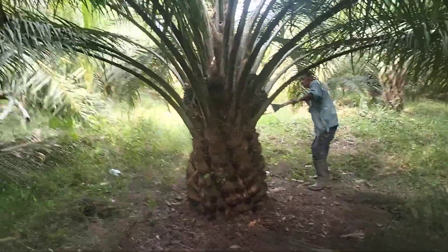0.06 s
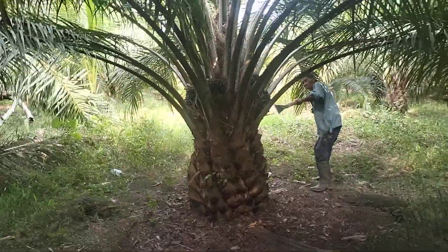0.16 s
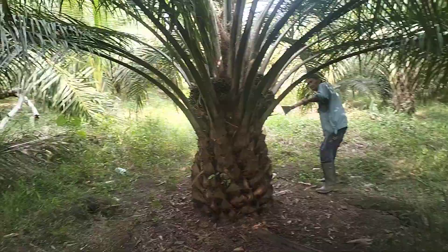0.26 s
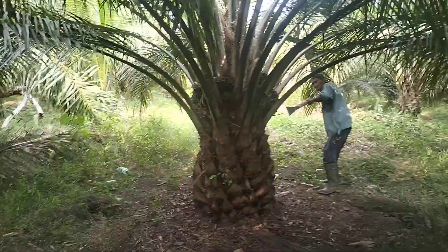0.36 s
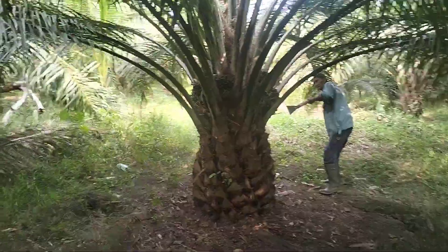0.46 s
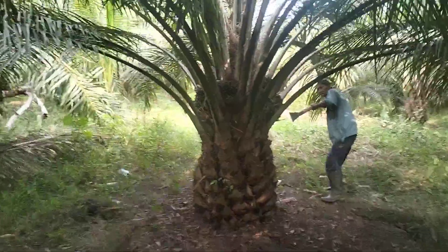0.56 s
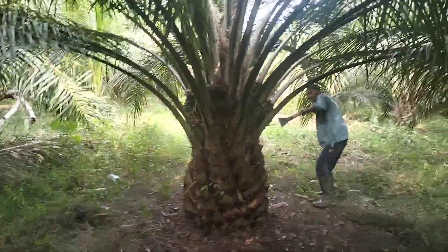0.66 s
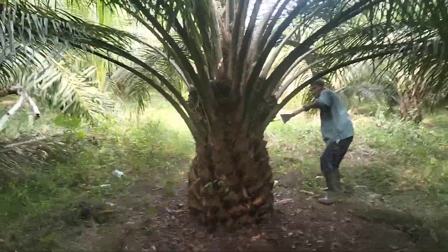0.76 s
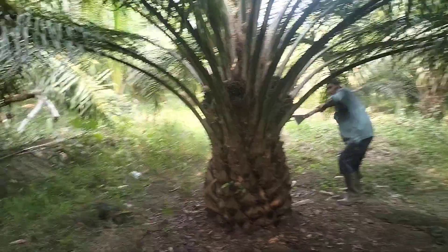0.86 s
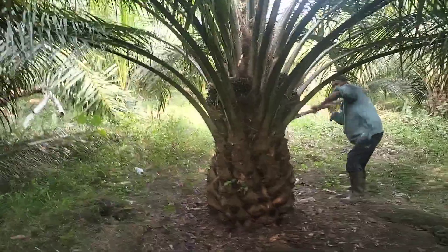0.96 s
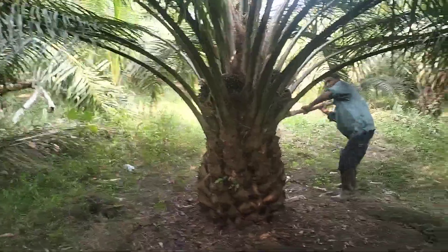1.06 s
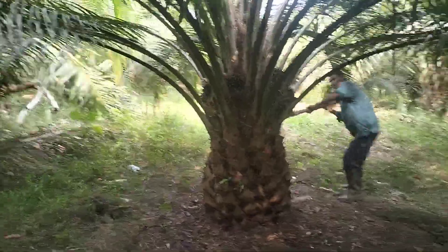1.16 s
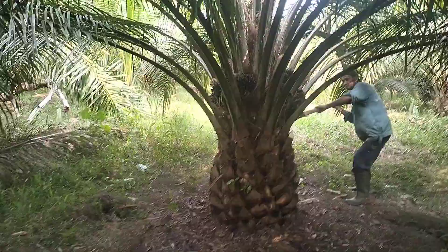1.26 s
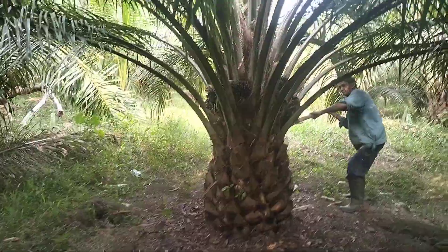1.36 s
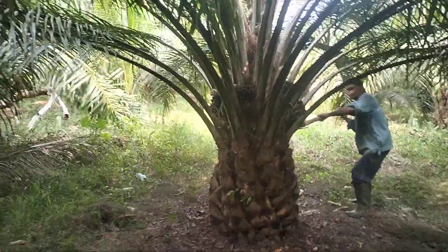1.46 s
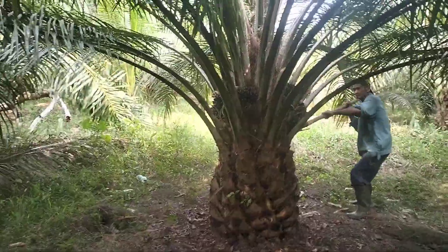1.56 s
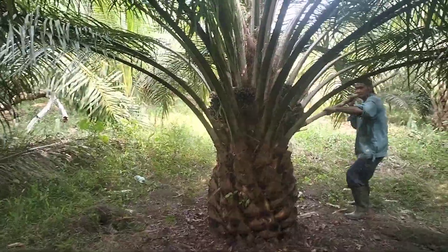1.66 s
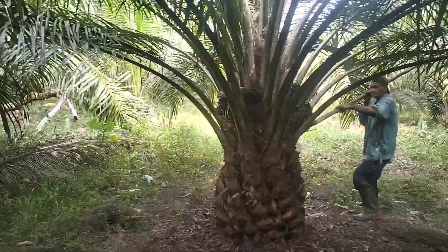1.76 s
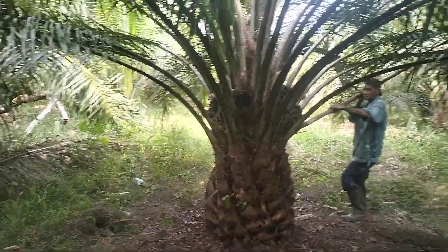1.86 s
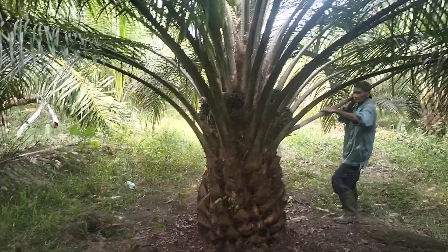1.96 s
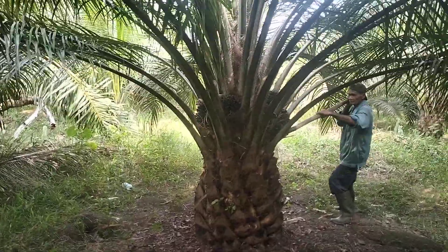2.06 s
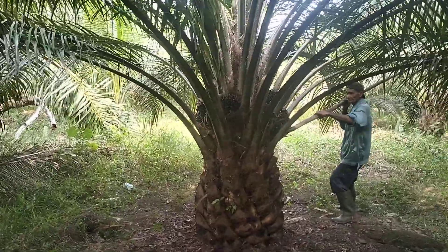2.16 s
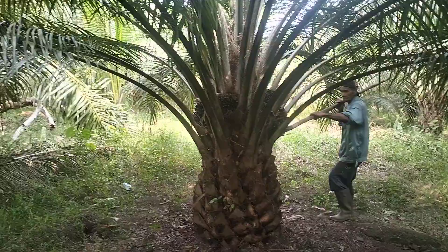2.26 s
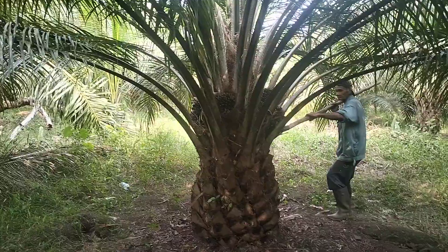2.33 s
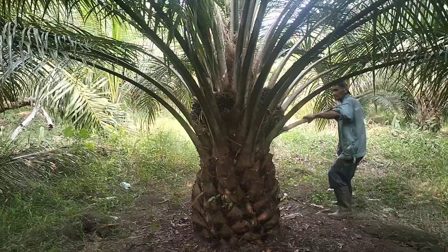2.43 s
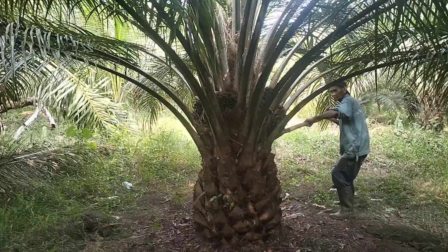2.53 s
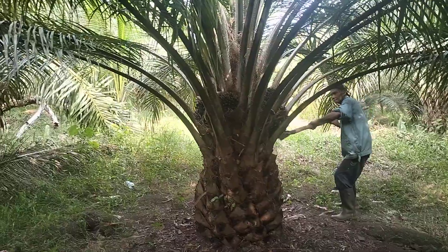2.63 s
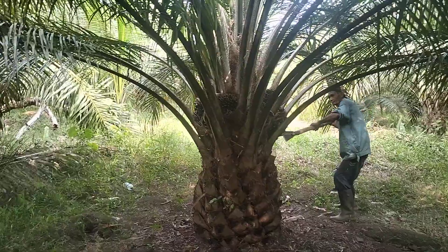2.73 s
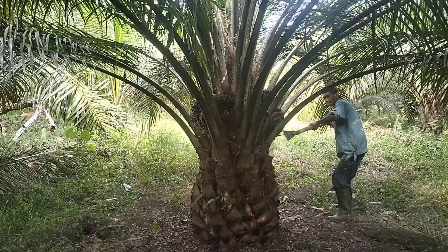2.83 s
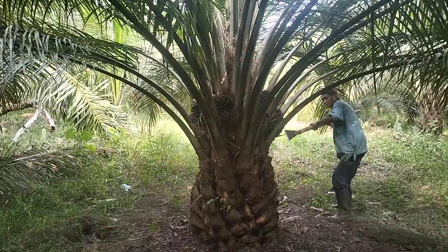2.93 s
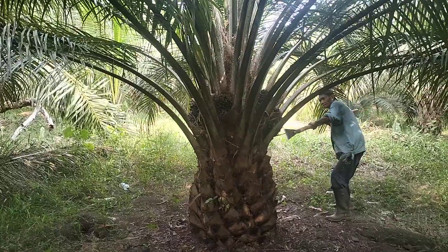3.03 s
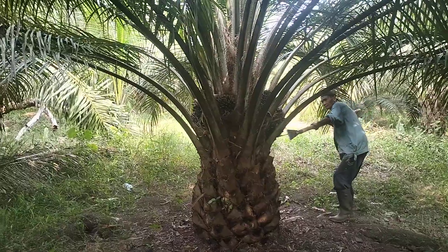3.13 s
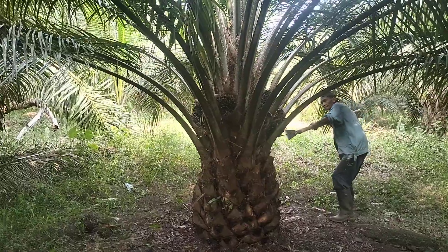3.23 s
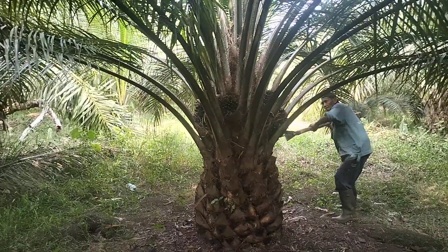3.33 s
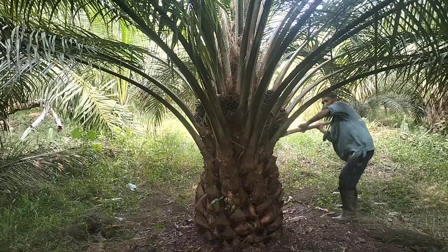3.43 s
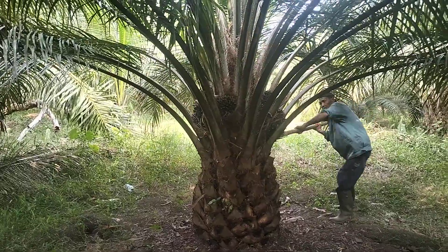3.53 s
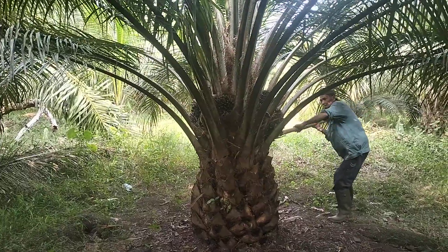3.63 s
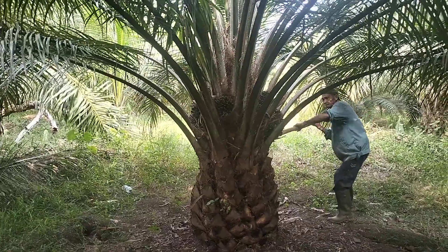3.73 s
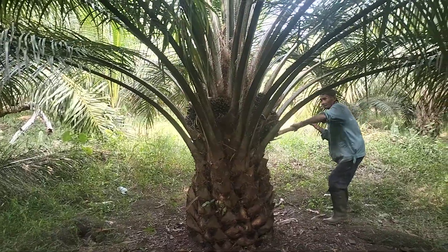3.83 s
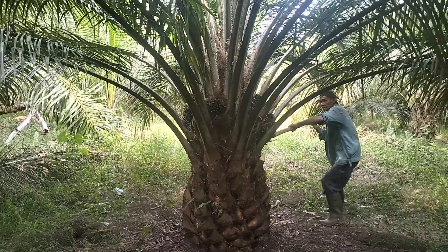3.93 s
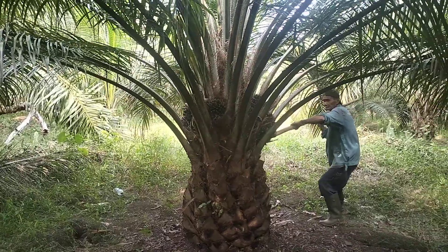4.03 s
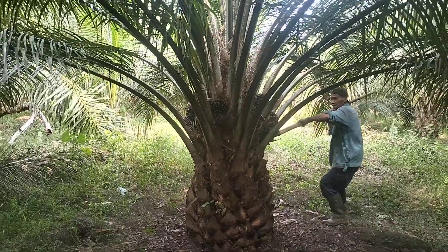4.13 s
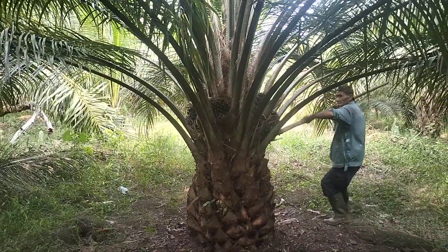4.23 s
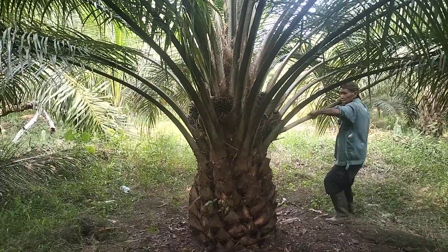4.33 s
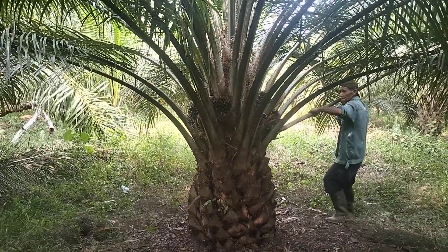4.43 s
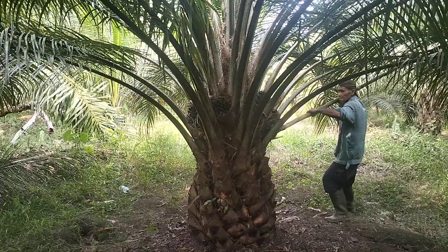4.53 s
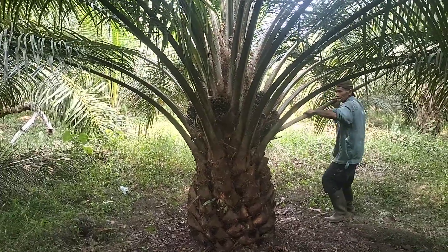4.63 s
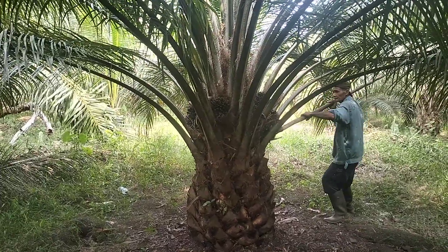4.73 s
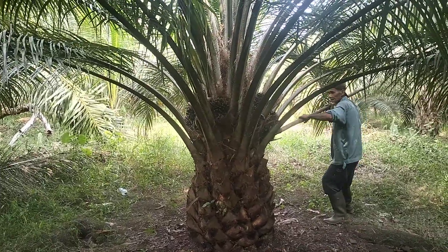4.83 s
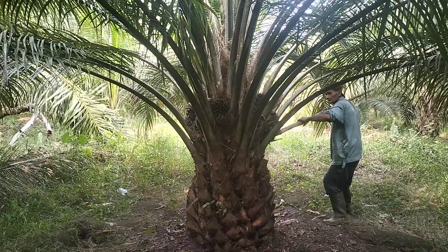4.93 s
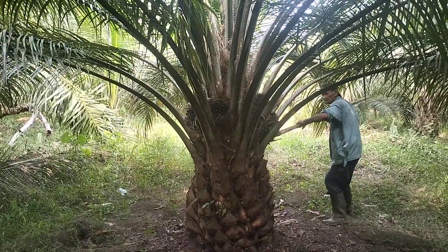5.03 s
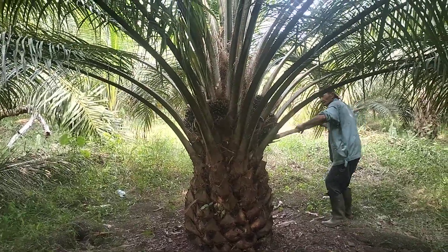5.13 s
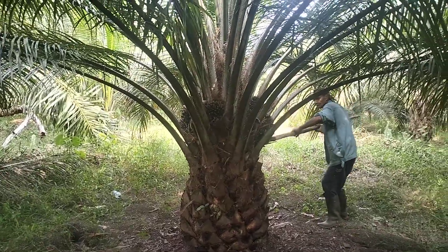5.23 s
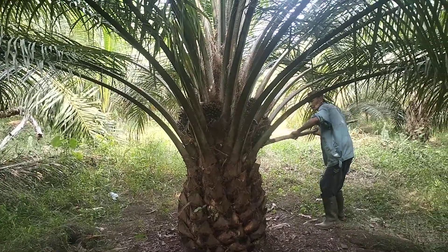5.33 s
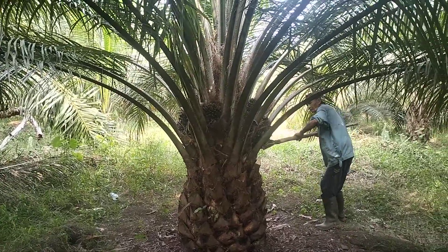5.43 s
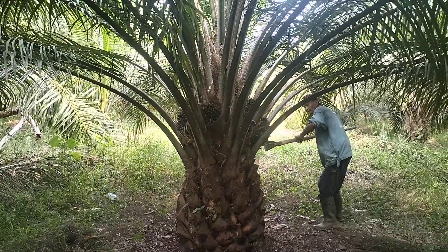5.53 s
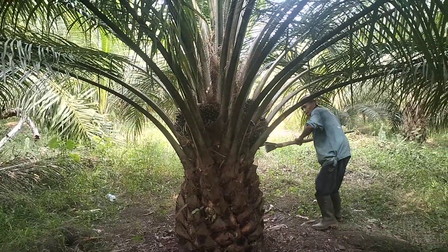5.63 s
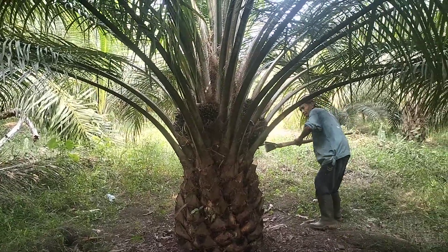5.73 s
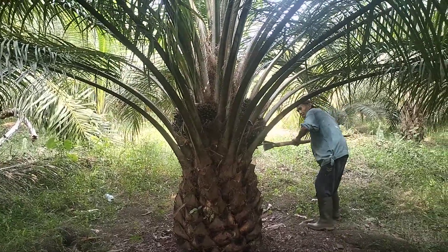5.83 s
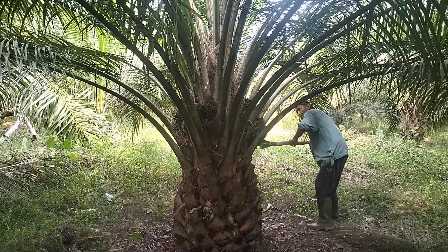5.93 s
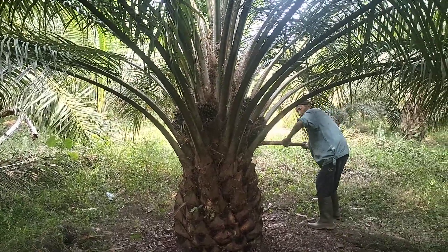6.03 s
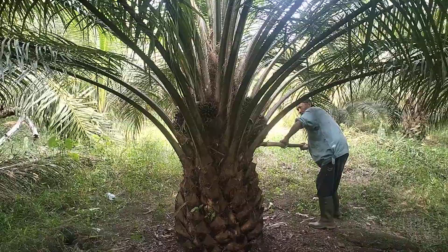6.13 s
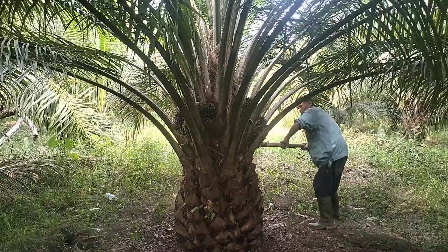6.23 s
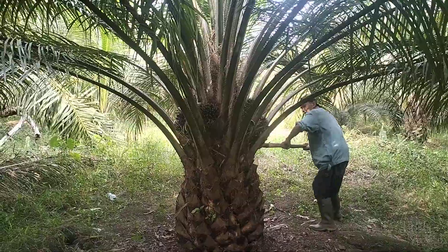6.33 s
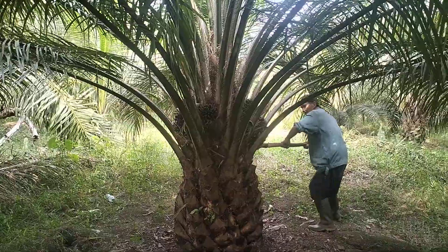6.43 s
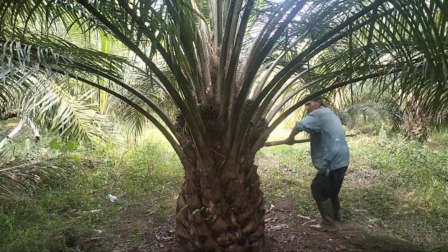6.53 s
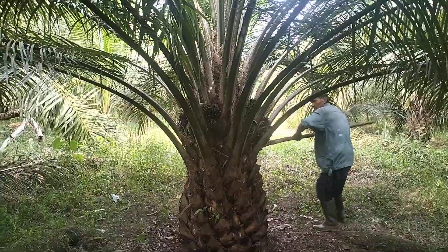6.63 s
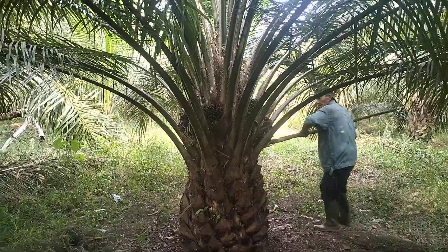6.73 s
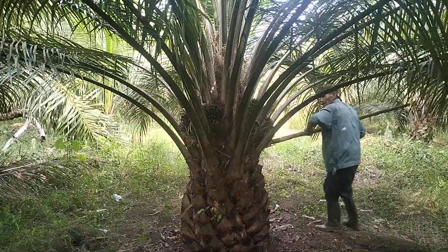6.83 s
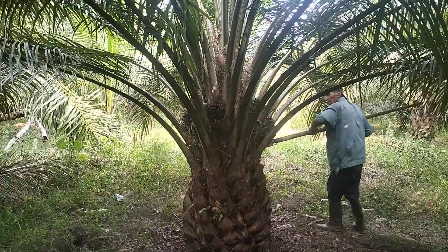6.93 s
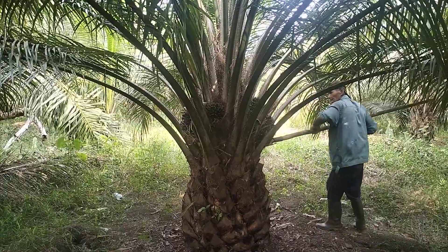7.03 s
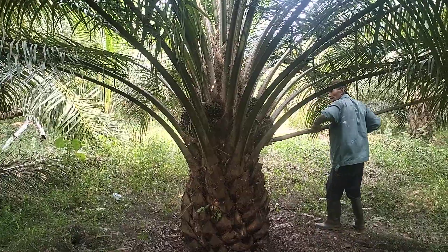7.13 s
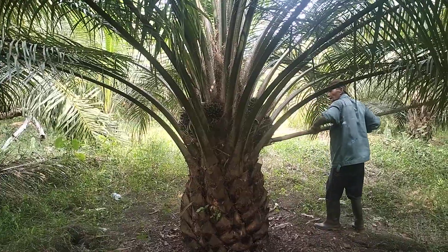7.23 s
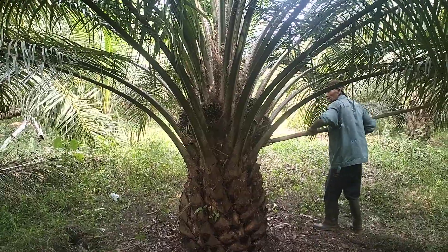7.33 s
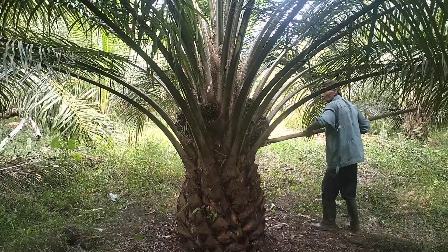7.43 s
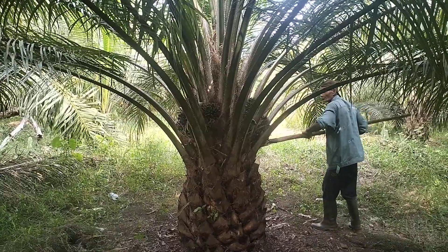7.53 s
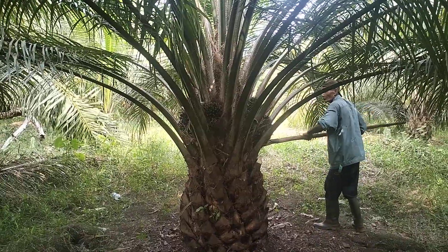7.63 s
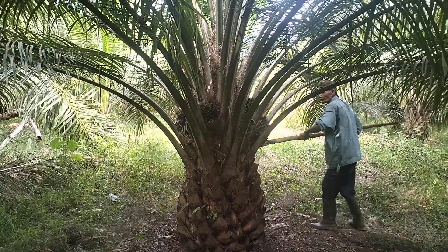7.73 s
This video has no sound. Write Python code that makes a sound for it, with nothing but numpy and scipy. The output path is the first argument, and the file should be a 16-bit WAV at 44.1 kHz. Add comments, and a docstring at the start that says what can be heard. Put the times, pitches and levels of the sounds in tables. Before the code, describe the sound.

Dry leaves and twigs crackle, then a hard chop cracks into a palm frond base, followed by a squeak and groaning creak. A second chop and lighter creaking follow, with a small low wind bump, then a third chop, more creaking and a cluster of dry snaps. Distant chirping birds and a thin insect hiss continue throughout; the natural stereo pickup is a few metres off, slightly band-limited.

```python
"""In a plantation full of insects, far birds and a little wind, a steel chisel on a long pole is driven
three times into the fibrous base of a palm frond and levered loose; dry leaves crackle underfoot.
Decaying modes ring blade, stem and crown; coloured grains and noise bursts tear, snap and rustle;
stick-slip pulses creak; gliding tones are birds; shaped noise is air. Two ports hear it, with echoes."""
import sys
import numpy as np
from scipy import signal
from scipy.fft import rfft, irfft, next_fast_len
from scipy.io import wavfile
from scipy.ndimage import uniform_filter1d

SR = 44100
rng = np.random.default_rng(int(sys.argv[2]) if len(sys.argv) > 2 else 0)


def persist_wave(psi):
    """Save psi, clipped to +-1, as 16-bit WAV."""
    counts = np.round(np.clip(psi, -1, 1) * 32767).astype(np.int16)
    wavfile.write(sys.argv[1], SR, np.atleast_2d(counts).T)


N = 343094


def amp(db):
    """Decibels to amplitude."""
    return 10 ** (np.asarray(db) / 20)


def evened(x):
    """Scale to an rms of 1 over all channels."""
    return x / np.sqrt(np.mean(x ** 2) + 1e-20)


def read(points, hz, column=1):
    """Interpolate a table column over log frequency."""
    points = np.transpose(points)
    return np.interp(np.log(hz + 1), np.log(points[0] + 1), points[column])


def add(mix, start_s, sound):
    """Mix a sound in at its start time, cut at the end."""
    part = mix[max(round(start_s * SR), 0):][:len(sound)]
    part += sound[:len(part)]


def taps(gain_db, size=1024):
    """Minimum-phase response of energy 1 for a gain curve at rfft bins."""
    log_gain = np.maximum(gain_db, -100) * np.log(10) / 20
    full = np.concatenate([log_gain, log_gain[-2:0:-1]])
    phase = -signal.hilbert(full).imag
    h = np.fft.ifft(np.exp(full + 1j * phase)).real[:size]
    return h / np.linalg.norm(h)


def colour(x, spectrum):
    """Filter every channel by a (hz, level_db) table."""
    gain_db = read(spectrum, np.fft.rfftfreq(4096, 1 / SR))
    return signal.oaconvolve(x, taps(gain_db)[None], axes=1)[:, :N]


def ring(modes, length_s, rise_s, detune=1):
    """Sum of decaying sines (hz, level_db, t60_s) with a soft onset."""
    t = np.arange(round(length_s * SR)) / SR
    tones = np.zeros(len(t))
    for (hz, db, t60_s), ratio in zip(modes, detune * np.ones(len(modes))):
        tones += amp(db - 60 * t / t60_s) * np.sin(2 * np.pi * hz * ratio * t)
    return tones * (1 - np.exp(-t / rise_s))


def grains(per_s, spread_db, clump_s, channels):
    """Sparse clicks of uneven size that come in clumps; channels share the times, not the values."""
    chance, size = rng.random(N), rng.exponential(1, N)
    noise = rng.standard_normal((channels + 1, N))
    clumps = evened(signal.oaconvolve(noise[0], np.hanning(round(clump_s * SR)), "same"))
    level_db = spread_db * np.minimum(size, 4) + 2.54 * np.tanh(clumps)
    return evened((chance < per_s / SR) * noise[1:] * amp(level_db))


DROOP_DB = -6.5  # dull part, over its hold


def fibres(swells, bright, dull, stop_s):
    """Swells linear in dB: thin grains rise and fall; dull ones rise, droop, then lose 20 dB in stop_s."""
    t, thin, deep = np.arange(N) / SR, np.zeros(N), np.zeros(N)
    for peak_s, db, depth_db, rise_s, hold_s, fall_s in swells:
        after_s = t - peak_s
        rising_db = 20 * after_s / max(rise_s, .001)
        thin += amp(db + np.minimum(rising_db, -20 * after_s / fall_s))
        sinking_db = DROOP_DB * after_s / hold_s - 20 * np.maximum(after_s - hold_s, 0) / stop_s
        deep += amp(db + depth_db + np.minimum(rising_db, sinking_db))
    return thin * bright, deep * dull


# far leaves, spectrum: hz, level_db
AIR = [(30, 1.5), (150, 1.5), (500, 2.5), (1200, -2), (2200, 2.5), (3500, -8), (4500, -14.5), (7500, -11),
       (12000, -7), (15000, -9)]
# insect choruses: centre_hz, width_hz, level_db
INSECTS = [(3064, 235, -70), (7940, 376.3, -70), (9806.1, 877.6, -62.5)]
AIR_DB, AIR_PATCHES_DB, INSECT_PATCHES_DB = -59, 2.0, .8


def leaves_and_insects():
    """Random short-time spectra: far leaves and insect bands with drifting patches."""
    frames, hz = N // 256 + 5, np.fft.rfftfreq(1024, 1 / SR)[:, None]
    real, imag, patches = rng.standard_normal((frames, 513, 2, 3)).T
    patches = evened(uniform_filter1d(uniform_filter1d(patches[0], 8, 0), 12, 1))

    def play(gain):
        spectra = (real + 1j * imag) * gain
        return evened(signal.istft(spectra, nperseg=1024, noverlap=768)[1][:, :N])

    out = amp(AIR_DB) * play(amp(read(AIR, hz) + AIR_PATCHES_DB * patches))
    for centre_hz, width_hz, db in INSECTS:
        band = np.exp(-2 * ((hz - centre_hz) / width_hz) ** 2)
        out += amp(db) * play(band * amp(INSECT_PATCHES_DB * patches))
    return out


# wind on the ports, mean of both: time_s, level_db
WIND = [(0, -79.5), (3.1, -74.5), (3.5, -78), (3.75, -66), (4.1, -73), (4.2, -75.5), (7.78, -78)]
# gusts bump the right port: centre_s, right_level_db, pitch_hz, half_length_s
BUFFETS = [(3.789, -48, 55, 0.01363), (3.855, -53, 60, 0.0116), (3.958, -51, 35.97, 0.01459),
           (4.07, -49, 36.03, 0.01417), (4.314, -27.5, 67, 0.0065)]


def wind():
    """Lumpy low noise of air on the ports, with short low bumps from gusts."""
    t = np.arange(N) / SR
    slow = signal.butter(2, 6.0, fs=SR, output="sos")
    lumps = evened(signal.sosfilt(slow, rng.standard_normal((2, N))))
    low_band = signal.butter(2, [40., 85.], "band", fs=SR, output="sos")
    rumble = signal.sosfilt(low_band, rng.standard_normal((2, N)))
    level_db = np.interp(t, *np.transpose(WIND)) + [[-2.5], [2.5]]
    out = amp(level_db) * evened(rumble * amp(1.3 * lumps))
    for s, db, hz, half_s in BUFFETS:
        bump = -np.exp(-((t - s) / half_s) ** 2) * np.cos(2 * np.pi * hz * (t - s))
        out += amp([[db - 33], [db]]) * bump
    return out


# far bird notes: start_s, length_s, mid_hz, droop_share_of_mid, level_db
BIRDS = [(0, 0.0087, 2320, 0.12, -44), (0.048, 0.031, 2129, 0.15, -47), (.085, 0.017, 2890, 0.0406, -49),
         (.15, .03, 2040, -0.23, -54.5), (0.197, 0.027, 2292, 0.15, -46.5),
         (0.24, 0.02617, 2134, 0.0318, -48), (0.455, 0.036, 2197, 0.069, -49),
         (0.602, 0.02216, 2198, 0.19, -50), (0.64, 0.03615, 2204, 0.022, -48), (.84, 0.039, 1980, 0.2, -54),
         (3.24, 0.034, 3460, 0.0234, -55), (3.28, 0.048, 2464, -0.04, -53),
         (3.668, 0.0434, 4300, 0.016, -57), (3.74, 0.04, 3480, -0.12, -54),
         (3.76, 0.033, 3000, 0.00076, -53.5), (3.785, 0.071, 3556, 0.0119, -56),
         (4.0, 0.036, 2450, -0.02, -57.5), (4.035, 0.033, 2570, .01, -54), (4.06, 0.046, 2945, 0.012, -60),
         (4.17, 0.039, 4130, 0, -58.5), (4.2, 0.027, 4960, 0.14, -60), (4.23, 0.05226, 3000, -0.2, -55.5),
         (4.272, 0.072, 3390, 0.0094, -57.5), (4.905, 0.052, 2256, .22, -55),
         (4.915, 0.046, 2030, 0.02, -48.5), (5.488, 0.027, 1876, 0.0029, -53.5),
         (5.53, 0.064, 2210, -0.058, -60.5), (6.645, 0.047, 2170, -0.3129, -52),
         (7.19, 0.046, 2150, 0.05, -56.5), (7.31, 0.049, 2190, 0.19, -54.5)]
CHATTER_PER_S, CHATTER_MIN_DB = 12, -70  # fainter notes further off


def birds():
    """Gliding whistles, roughened by the moving air on the way; fainter ones at random."""
    out = np.zeros(N)
    u = rng.random((round(CHATTER_PER_S * N / SR), 5))
    start_s, length_s = u[:, 0] * N / SR, .02 + .04 * u[:, 1]
    mid_hz, droop = 1950 + 1400 * u[:, 2] ** 4.5, .12 - .14 * u[:, 4]
    chatter = np.c_[start_s, length_s, mid_hz, droop, CHATTER_MIN_DB + 8 * u[:, 3]]
    waver = evened(signal.oaconvolve(rng.standard_normal((2, N)), np.hanning(180)[None], "same"))
    for s, length_s, mid_hz, droop, db in [*BIRDS, *chatter]:
        n, at = round(length_s * SR), round(s * SR)
        glide_hz = mid_hz * np.linspace(1 + droop / 2, 1 - droop / 2, n)[:N - at]
        glide_hz = glide_hz * (1 + 0.014 * waver[0, at:at + n])
        swell = abs(np.hanning(len(glide_hz))) ** .5
        add(out, s, amp(db) * swell * np.sin(2 * np.pi * np.cumsum(glide_hz) / SR))
    return out * (1 + .45 * waver[1])


def echoes(x, start_s, t60_s):
    """Sparse reflections from trunks and fronds, other ones for each port."""
    n = round(t60_s * SR)
    tail = rng.choice([-1., 1.], (2, SR)) * (rng.random((2, SR)) < .08)
    tail = tail[:, :n] * amp(-60 * np.arange(n) / n)
    tail = tail / np.linalg.norm(tail, axis=1, keepdims=True)
    tail = np.pad(tail, ((0, 0), (round(start_s * SR), 0)))
    return signal.oaconvolve(x[None], tail, axes=1)[:, :N]


# leaf swells: peak_s, crackle_db, scuff_above_crackle_db, rise_s_per_20db, scuff_hold_s, crackle_fall_s_per_20db
RUSTLES = [(0.001, -54, -10, 0.7442, 0.35, 0.7873), (.42, -55.5, -7, 0.3336, 0.0633, 0.23),
           (1.31, -53.5, -6.5, 0.47, 0.1841, 0.56), (1.76, -47.5, 1.5, 0.37, 0.19, .5),
           (2.68, -51.5, -3.5, 0.25, 0.024, 0.03), (3.27, -57, -24, 0, 0.0498, 0.0018),
           (3.66, -56.5, -10, 0.3598, 0.31, 0.92), (4.22, -58, 3.5, 0.1265, 0.23, 0.54),
           (4.47, -52, -3, 0.22, 0.0342, 0.0858), (5.4, -64.5, -1, 2, 0.0508, 0.0349),
           (7.0, -50.5, -6.5, 0.3756, 0.26, 0.55)]


def rustles():
    """Leaves and litter: sparse dry crackle at each port, soft scuff."""
    crackle = grains(6000, 0.48, 0.009, channels=2)
    scuff = grains(3000, 2.0, 0.021, channels=1)
    return fibres(RUSTLES, crackle, scuff, stop_s=0.13)


# fronds groan and scrape under strain: start_s, length_s, mid_level_db, first_hz, last_hz
GROANS = [(1.565, 0.32, -46, 320, 264.5), (1.921, 0.043, -51, 364.9, 289.9),
          (2.563, 0.1, -53.5, 1360, 1284), (5.194, 0.086, -61.5, 487, 535), (5.288, .07, -67.5, 600, 910),
          (6.197, 0.03711, -41.5, 684, 422.7), (6.78, 0.165, -52, 444, 297)]
GROAN_ENDS_DB = -14.5


def groans():
    """Rubbing fibres excite a gliding resonance and its overtone; the strain arches up and lets go."""
    out, rub = np.zeros(N), grains(8000, .6, .004, channels=1)[0]
    for s, length_s, db, first_hz, last_hz in GROANS:
        u = np.linspace(-1, 1, round(length_s * SR))
        hz = np.geomspace(first_hz, last_hz, len(u))
        pole = np.exp(-np.pi * .4 * hz.mean() / SR)
        arch_db, fade = db + GROAN_ENDS_DB * u ** 2, signal.windows.tukey(len(u), .15)
        for ratio, overtone_db in (1, 1.5), (1.9, -2.5):
            # shift the glide to 0 Hz, low-pass twice, shift back
            turn = np.exp(2j * np.pi * ratio * np.cumsum(hz) / SR)
            slow = rub[round(s * SR):][:len(u)] / turn
            for _ in range(2):
                slow = signal.lfilter([1 - pole], [1, -pole], slow)
            add(out, s, amp(arch_db + overtone_db) * evened((turn * slow).real) * fade)
    return out


# cut fibres, first three skinned by the edge, the rest bitten through:
# peak_s, splinter_db, flesh_above_splinter_db, rise_s_per_20db, flesh_hold_s, splinter_fall_s_per_20db
RIPS = [(1.068, -31.5, -12, .006, .022, .14), (3.51, -40.5, -22, .007, .02, .2),
        (6.087, -27.5, -9, .009, .025, .055), (1.097, -22.5, -3, .013, .033, .055),
        (1.265, -36, -7, .07, .018, .04), (3.537, -38, 7, .003, .059, .13),
        (6.144, -32, -2, .002, .047, .085), (6.218, -46, 4, .03, .012, .06)]


def tearing():
    """Dense grains of fibres torn in the cut: splinters at each port, flesh."""
    splinters = grains(12000, 1.028, 0.019, channels=2)
    flesh = grains(5000, 0.741, 0.0046, channels=1)
    return fibres(RIPS, splinters, flesh, stop_s=0.011)


# big fibres and twigs part: start_s, level_db, flesh_above_splinter_db, t60_s
SNAPS = [(0.091, -48, -1, 0.0523), (0.2317, -50, 1.5, 0.097), (0.2602, -42.5, 4, 0.042),
         (0.276, -41, -9.5, 0.19), (0.353, -49.5, 7.5, 0.02797), (0.404, -35.5, -18, 0.067),
         (0.7742, -51, -1, 0.0475), (1.1016, -19.5, -1.5, 0.071), (1.1141, -26, -22, 0.1487),
         (1.709, -40, -7, 0.051), (1.753, -41, -10.5, 0.04766), (1.786, -43, -7, 0.0464),
         (2.069, -44, -9.5, 0.07775), (2.6909, -47, -20.5, 0.27), (3.548, -25, -1, 0.11),
         (3.5878, -43, 10, 0.035), (4.471, -33, -1.5, 0.06177), (4.529, -46.5, 2, 0.02953),
         (5.4206, -40.5, -10, 0.12), (6.143, -35, 8.5, 0.03083), (6.1543, -30, 7, 0.083),
         (6.538, -54, 11, 0.033), (6.7336, -47.5, -3.5, 0.1167), (6.9342, -42, 2.5, 0.04143),
         (7.0473, -32, -9, 0.03), (7.085, -36, -9, 0.033), (7.124, -29, -9.5, 0.03419),
         (7.13, -33.5, -7, 0.038), (7.144, -39, -18, 0.054), (7.1628, -38, -6, 0.092),
         (7.265, -44, -1, 0.044)]
TICK_DB, TICK_T60_S = -0.5, 0.0067  # thin tick, relative to its snap


def snaps():
    """Each snap is a sudden noise burst that dies away: splinters at each port, flesh."""
    bursts, noise = np.zeros((2, N)), rng.standard_normal((3, N))
    t = np.arange(6000) / SR
    for s, db, depth_db, t60_s in SNAPS:
        fall = amp(db - 60 * t / max(t60_s, .005)) * (1 - np.exp(-t / 0.0008983))
        tick = amp(db + TICK_DB - 60 * t / TICK_T60_S)
        add(bursts[0], s, fall + tick)
        add(bursts[1], s, fall * amp(depth_db))
    return bursts[0] * noise[:2], bursts[1] * noise[2:]


# first fast slips: start_s, length_s, level_db, first_hz, last_hz, body_hz, body_width_hz
SQUEAKS = [(1.362, 0.055, -52, 320.4, 278, 600.2, 600.5), (1.41, 0.045, -53, 264, 235.4, 522.3, 249.2)]


def squeak():
    """Slips so fast that they make a rough falling tone, overtones strongest near the stem's body."""
    out = np.zeros(N)
    for s, length_s, db, first_hz, last_hz, body_hz, width_hz in SQUEAKS:
        hz = np.linspace(first_hz, last_hz, round(length_s * SR))
        waver, rough = evened(uniform_filter1d(rng.standard_normal((2, 4000)), 150))[:, :len(hz)]
        turns = np.cumsum(hz * (1 + 0.027 * waver)) / SR
        tone = np.zeros(len(hz))
        for k in range(1, 8):
            body = 1 / (1 + ((k * hz - body_hz) / width_hz) ** 2)
            tone += body * np.cos(2 * np.pi * (k * turns + rng.random()))
        add(out, s, amp(db) * evened(tone) * (1 + 0.4 * rough) * np.hanning(len(hz)) ** 0.51)
    return out


# blade sticks and slips while levered, one curve a pull: time_s, stick_s, stem_ring_db
PULLS = [
    [(1.536, 0.0227, -38), (1.62, 0.013, -35.5), (1.7, 0.0159, -35.5), (1.735, 0.0272, -27.5),
     (1.79, 0.0387, -26), (1.835, 0.0387, -30.5)],
    [(4.138, 0.014, -55.5), (4.2, 0.0134, -43.5), (4.25, 0.0188, -35), (4.33, 0.037, -33.5),
     (4.368, 0.0363, -34)],
    [(6.76, 0.0146, -57), (6.82, 0.0109, -41), (6.87, 0.018, -35.5), (6.9, 0.0288, -37.5),
     (6.936, 0.029, -37)],
]
# deeper blade, longer slip; one row a pull: half_length_s, first_hz, sag_hz_per_s, crack_above_ring_db
GRIP = [(.0022, 597, 332.5, -11.5), (.003, 575, -32, -9.5), (.00307, 570, 42, -7.5)]
# single slips as the blade works free: time_s, stem_ring_db, stem_hz, crack_above_ring_db
LATE_SLIPS = [(1.816, -48.5, 521, 10.5), (1.864, -46, 527.4, -1), (1.882, -50, 518.8, 5),
              (1.896, -45.5, 536.1, 1), (1.928, -28, 504, -8.5), (1.931, -33.5, 864, -9.5),
              (4.391, -47.5, 602.5, 10.5), (4.427, -47, 580, -12), (4.4355, -36, 576.2, -9),
              (4.477, -37, 1016, -5)]
CRACK_DB_PER_S = 479.5  # a stick longer than 15 ms cracks harder, up to 25 ms
SLIP_SPREAD_DB, SLIP_SPREAD_HZ = 0.9689, 14


def slips():
    """Each slip comes one stick time after the last: time_s, ring_db, hz, crack_db, half_length_s."""
    rows = []
    for pull, (half_s, first_hz, sag_hz_per_s, crack_db) in zip(PULLS, GRIP):
        times_s, stick_s, level_db = np.transpose(pull)
        s, held_s = times_s[0], stick_s[0]
        for chance_db, chance_hz in rng.standard_normal((40, 2)):
            if s <= times_s[-1]:
                ring_db = np.interp(s, times_s, level_db) + SLIP_SPREAD_DB * chance_db
                hz = first_hz - sag_hz_per_s * (s - times_s[0]) + SLIP_SPREAD_HZ * chance_hz
                harder_db = CRACK_DB_PER_S * (min(held_s, .025) - .015)
                rows.append((s, ring_db, hz, crack_db + harder_db, half_s))
            held_s = np.interp(s, times_s, stick_s)
            s += held_s
    for row in LATE_SLIPS:  # grip of the latest pull begun
        begun = [grip[0] for pull, grip in zip(PULLS, GRIP) if pull[0][0] < row[0]]
        rows.append((*row, begun[-1]))
    return rows


# flesh, spectrum: hz, level_db
FLESH = [(70, -24.5), (170, -7.5), (260, -9.5), (480, -1), (780, -6.5), (1400, -0.5), (2000, -1.5),
         (2700, -4.5), (3300, -8), (6000, -47.5)]
# stem overtones: hz, level_db, t60_s (base value, scaled in cracks and wedged)
STEM = [(980, 4.5, 0.026), (1357, 7, 0.017), (1714, 12.5, 0.0084), (2220, 2.5, 0.018), (2660, -1.5, 0.033),
        (3642.1, 2, 0.008676)]
RASP_DB, RASP_T60_S = -12.5, 0.045  # relative to the slip's ring


def creak():
    """Each slip cracks, the stem swells and is damped as the blade grips again; fibres rasp after it."""
    out, rasp, t = np.zeros(N), np.zeros(N), np.arange(1500) / SR
    chance = rng.standard_normal((80, len(STEM)))
    for (s, db, hz, crack_db, half_s), c in zip(slips(), chance):
        swell = (1 - np.exp(-t / 0.0014)) * np.exp(-(t / (3.23 * half_s)) ** 5.4)
        swell += 0.31 * np.exp(-t / 0.0063)
        turns = hz * (t + 0.00042 * (1 - np.exp(-t / 0.00048)))  # starts a little high
        crack = ring(STEM, .05, 0.00049, detune=1 + 0.057 * c)
        add(out, s - 1.705 * half_s, amp(db) * swell * np.sin(2 * np.pi * turns))
        add(out, s - 1.9 * half_s, amp(db + crack_db) * crack)
        add(rasp, s - 1.9 * half_s, amp(db + RASP_DB - 60 * t / RASP_T60_S))
    return out + colour(rasp * grains(4000, 1.8, 0.0048, channels=1), FLESH)[0]


# blade meets stem: time_s, ring_db, knock_db, knock_lead_s
BLOWS = [(1.067, -42.5, -28.5, .002), (3.5058, -38.5, -53.5, .002), (6.084, -30, -33, .006)]
# steel modes: hz, level_db, t60_s (base value, shorter in wedged)
BLADE = [(1884, 7.5, 0.13), (2460, 8.5, 0.036), (3310, -7, 0.13), (4036.1, -1, 0.15), (4500, 0, 0.069),
         (4766, -11, 0.0731), (6470, -2.5, 0.0749), (8900, -4, 0.15)]
# thick strands break and ring the stem: time_s, level_db, pitch_ratio
CRACKS = [(1.101, -33, 1.2), (1.1075, -30, 1.12), (1.7515, -47, 1.1), (1.781, -45, 1), (2.062, -57, 1.06),
          (3.5355, -51, .8), (3.5495, -27, 1.1), (3.5605, -30, 1.05), (6.1425, -41, .6),
          (6.1548, -26.5, 1.08), (6.173, -38, 1.15), (6.553, -58, .6)]
# crown of the palm booms: time_s, level_db
CROWN = [(1.119, -48.5), (1.759, -50.5), (1.924, -61), (3.568, -51.5), (6.161, -47), (6.88, -63.5)]
# crown modes: hz, level_db, t60_s
CROWN_MODES = [(129.3, 11.5, 0.22), (176, 1.5, 0.21)]
WEDGED_S = 0.25  # after each blow


def wedged(deep):
    """While the blade is in the cut, tearing fibres shake its damped steel and the stem."""
    t = np.arange(N) / SR
    inside = sum((t > blow[0]) & (t < blow[0] + WEDGED_S) for blow in BLOWS)
    damped = [(hz, db, 0.3 * t60_s) for hz, db, t60_s in BLADE[:2] + STEM[:5]]
    body = ring(damped, .08, 0.00048)
    return amp(-8) * signal.oaconvolve(deep * inside, body / np.linalg.norm(body))[:N]


def blows():
    """Modes of struck bodies: steel rings in the cut, the stem knocks and cracks, the crown booms."""
    out = np.zeros(N)
    knock = ring([(400.74, 5.61, 0.042), (514.82, 6.7, 0.01451)], .1, 0.0064)
    for s, ring_db, knock_db, lead_s in BLOWS:
        add(out, s, amp(ring_db) * ring(BLADE, .3, 0.0015))
        add(out, s - lead_s, amp(knock_db) * knock)
    strand = [(hz, db, 1.6 * t60_s) for hz, db, t60_s in STEM]
    for s, db, pitch in CRACKS:
        add(out, s, amp(db) * ring(strand, .05, .0008, detune=pitch))
    for s, db in CROWN:
        add(out, s, amp(db) * ring(CROWN_MODES, .5, 0.0058))
    return out


# splinters, spectrum: hz, level_db
SPLINTER = [(900, -40), (2000, 8), (3500, 1.5), (7000, 1), (10000, 6), (15000, 1)]
# worker nearer the left port, left leads right: hz, lead_rad
LEAD = [(700, 0), (1500, 1), (2000, 1.3), (2500, 2), (3300, 4), (15000, -2.5)]


def scene():
    """Near work with its phase lead and echoes, over the far grove."""
    thin, deep = (sum(parts) for parts in zip(rustles(), tearing(), snaps()))
    splinters = colour(thin, SPLINTER)  # treble reaches each port scattered its own way
    near = colour(deep, FLESH)[0] + wedged(deep[0]) + blows() + creak() + squeak() + groans()
    size = next_fast_len(N)
    lead = np.exp(.5j * np.outer([1, -1], read(LEAD, np.fft.rfftfreq(size, 1 / SR))))
    pair = irfft(rfft(near, size) * lead, size)[:, :N] + splinters
    near_echoes = amp(-14.5) * echoes(near + splinters[0], .012, 0.18)
    far = birds()
    grove = far + amp(-2) * echoes(far, .003, .4)
    return pair + near_echoes + grove + leaves_and_insects() + wind()


# colour of the two ports in the housing: hz, left_db, right_db
PORTS = [(780, 1.5, 0.5), (1910, -4, 0), (4186, -0.5, 3.5), (5130, -3, 4.5), (6240, -12, 2.5),
         (6951.7, -18, 6.5), (7705.4, -9, 1), (8600, -1, -47.5), (9034.3, 0, -11), (10274, -4, -26),
         (11102, -4, -17), (11690, -5.5, -9.5), (13995, -9, -9)]
EDGE_HZ = 14300


def record(dry):
    """Each port has its own notches; then the band limit."""
    size = next_fast_len(N)
    hz = np.fft.rfftfreq(size, 1 / SR)
    ports = amp([read(PORTS, hz, column=k) for k in (1, 2)])
    heard = irfft(rfft(dry, size) * ports, size)[:, :N]
    low_pass = signal.firwin(601, EDGE_HZ, window=("kaiser", 9), fs=SR)
    return signal.oaconvolve(heard, low_pass[None], "same")


dry = scene()
out = record(dry)
persist_wave(out)
```